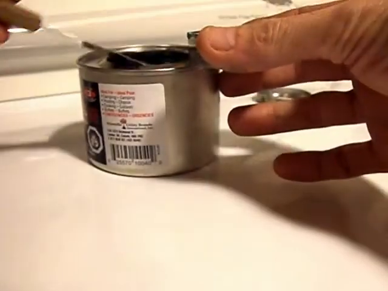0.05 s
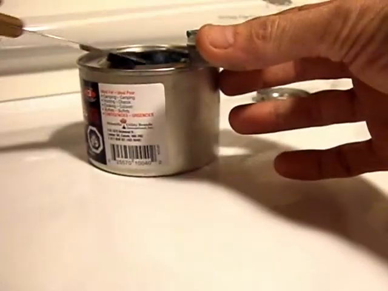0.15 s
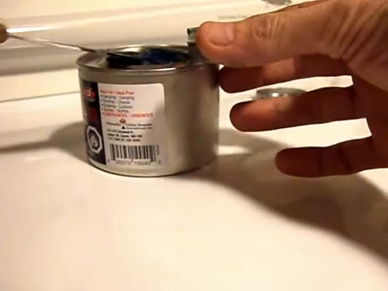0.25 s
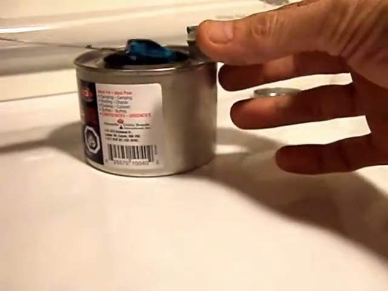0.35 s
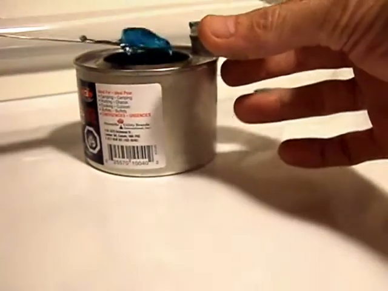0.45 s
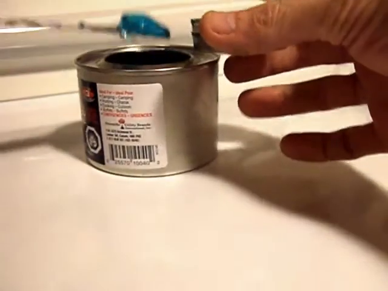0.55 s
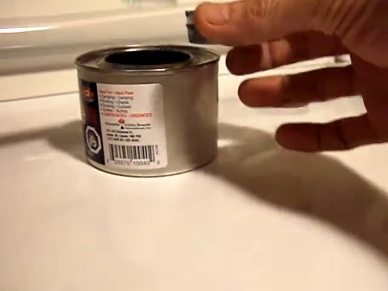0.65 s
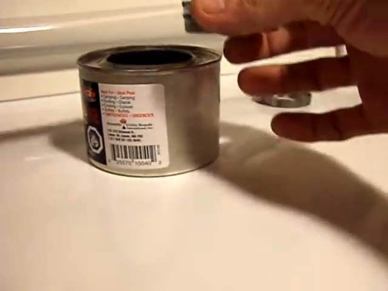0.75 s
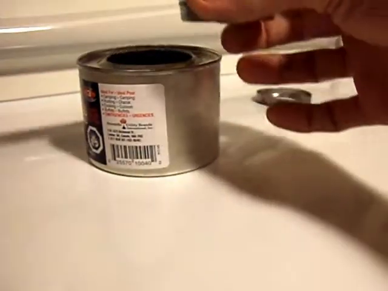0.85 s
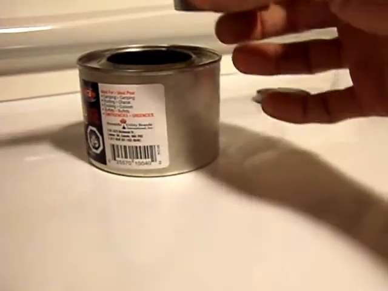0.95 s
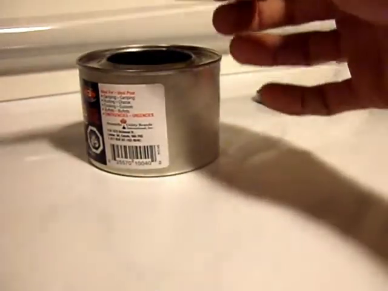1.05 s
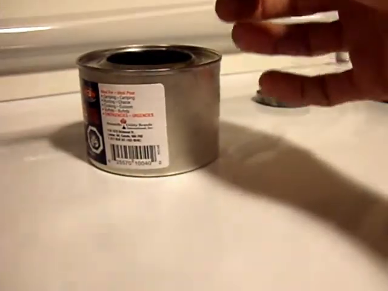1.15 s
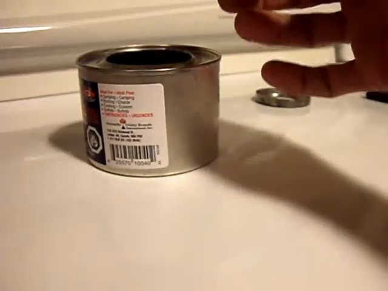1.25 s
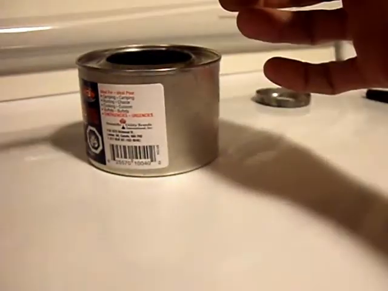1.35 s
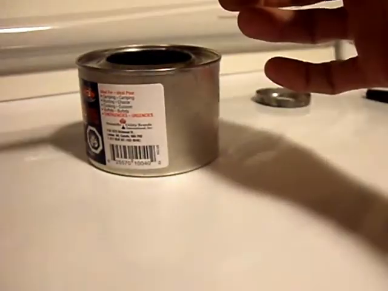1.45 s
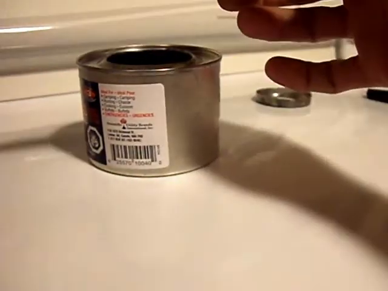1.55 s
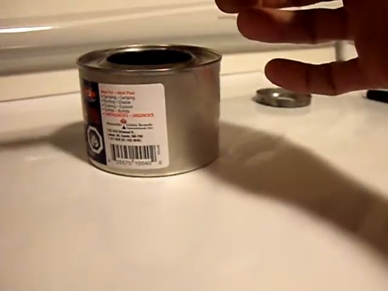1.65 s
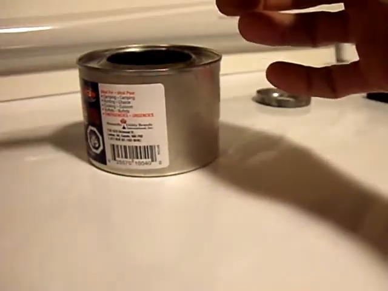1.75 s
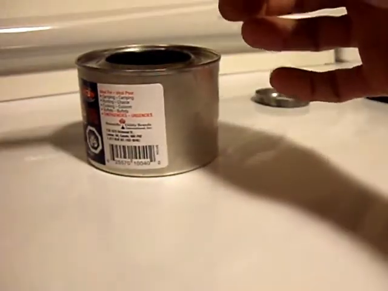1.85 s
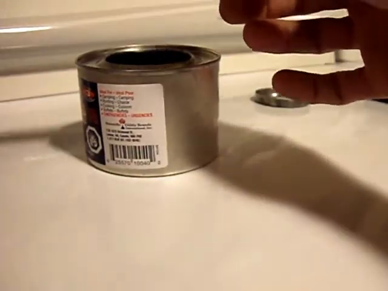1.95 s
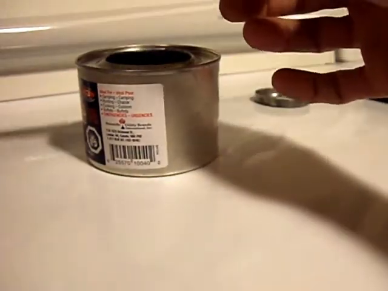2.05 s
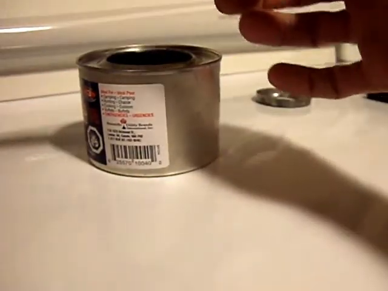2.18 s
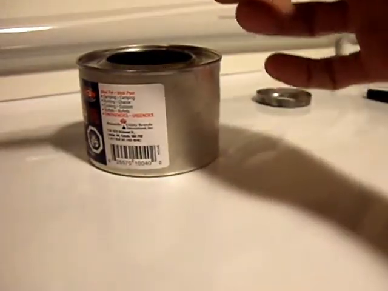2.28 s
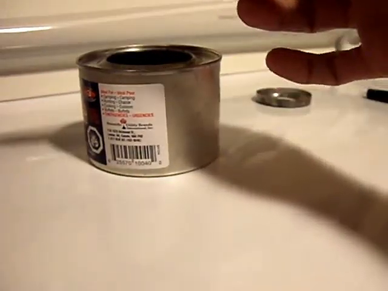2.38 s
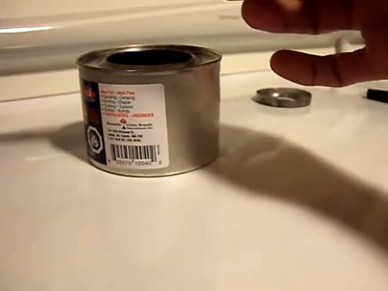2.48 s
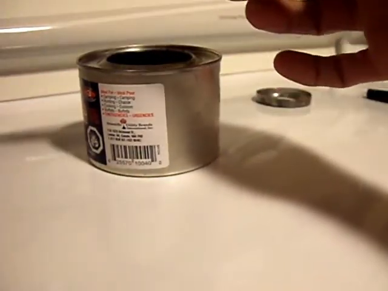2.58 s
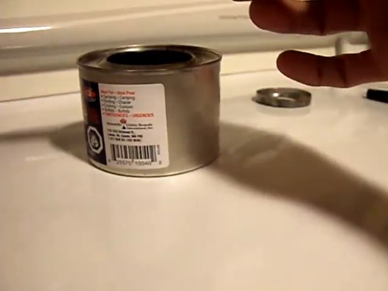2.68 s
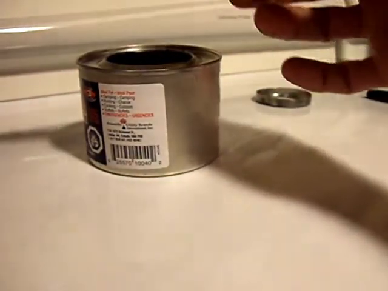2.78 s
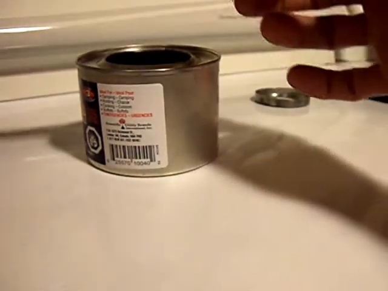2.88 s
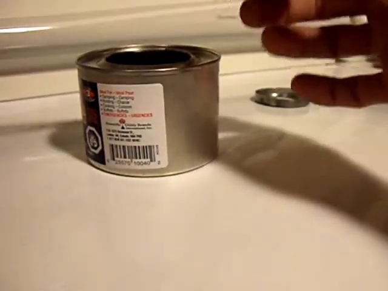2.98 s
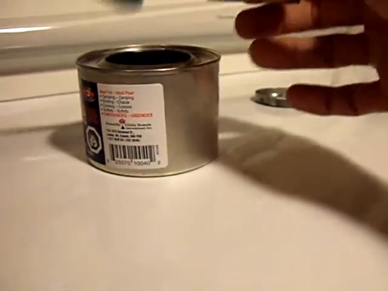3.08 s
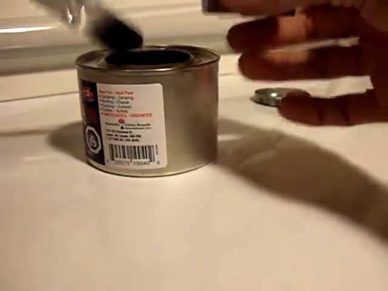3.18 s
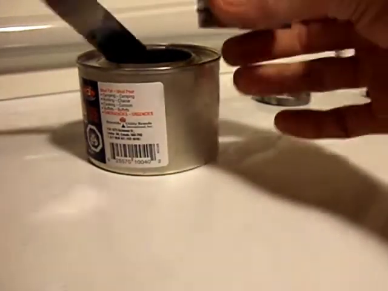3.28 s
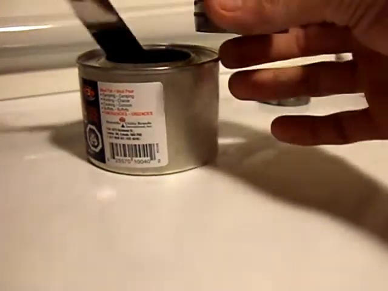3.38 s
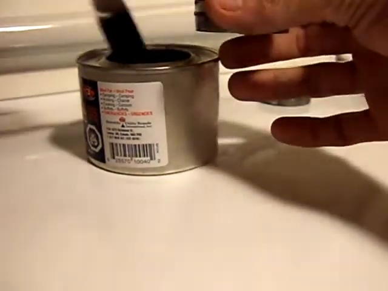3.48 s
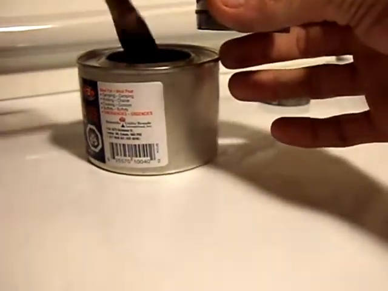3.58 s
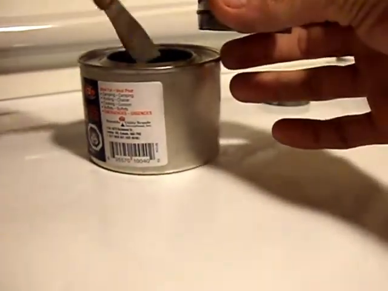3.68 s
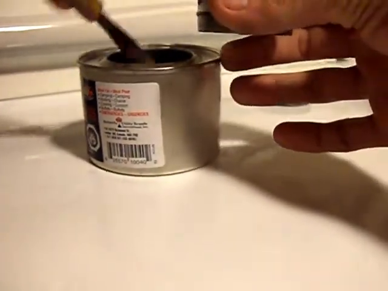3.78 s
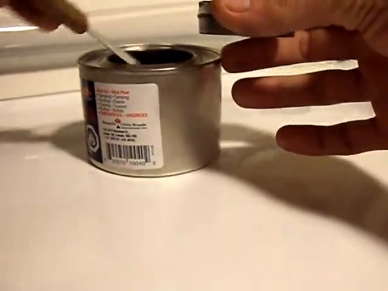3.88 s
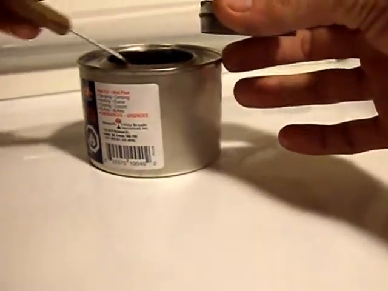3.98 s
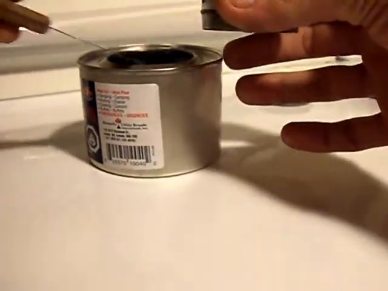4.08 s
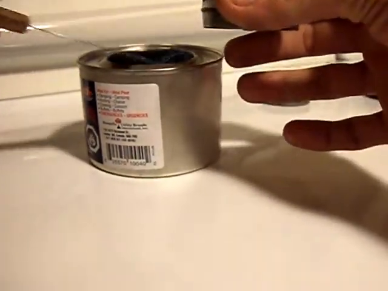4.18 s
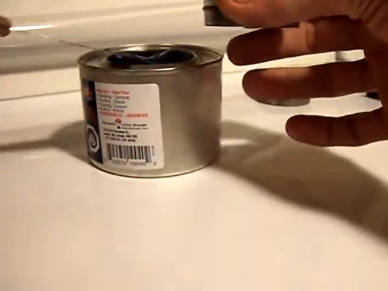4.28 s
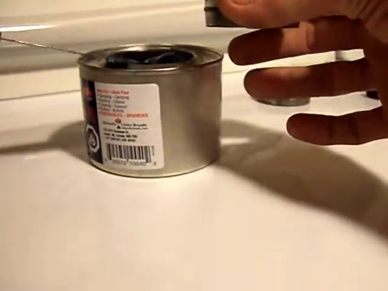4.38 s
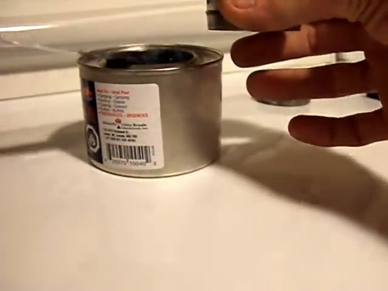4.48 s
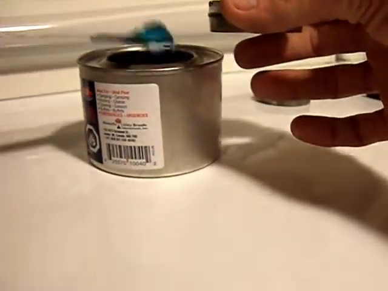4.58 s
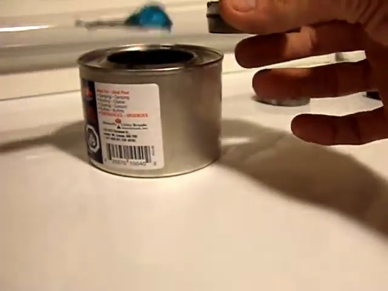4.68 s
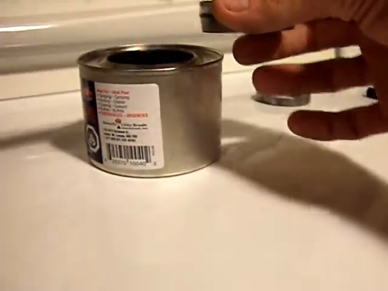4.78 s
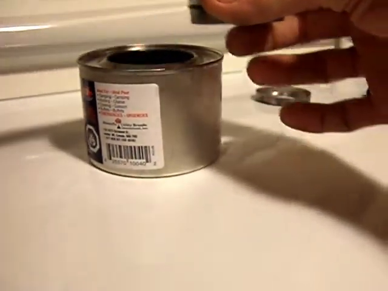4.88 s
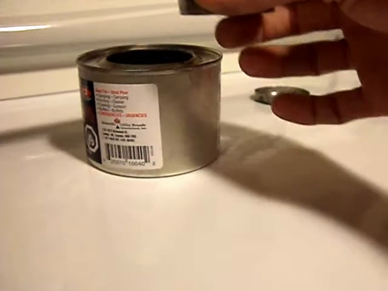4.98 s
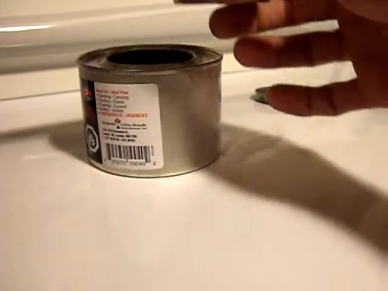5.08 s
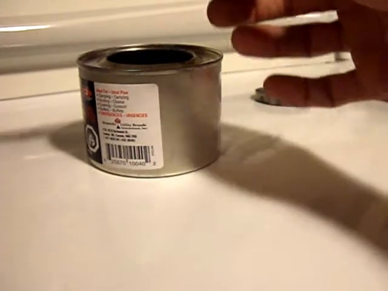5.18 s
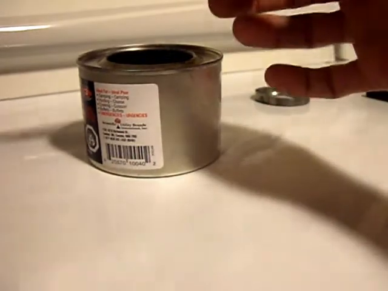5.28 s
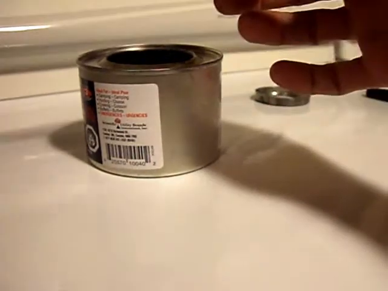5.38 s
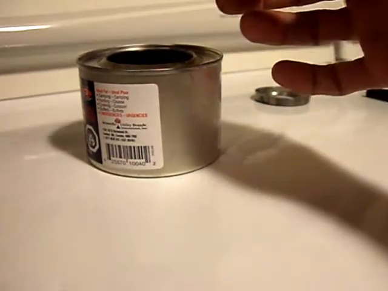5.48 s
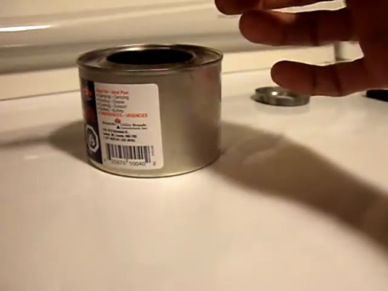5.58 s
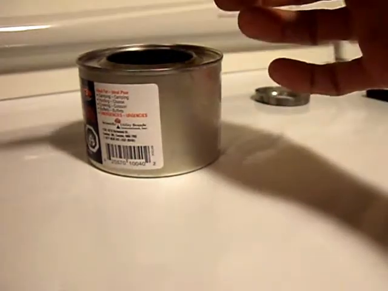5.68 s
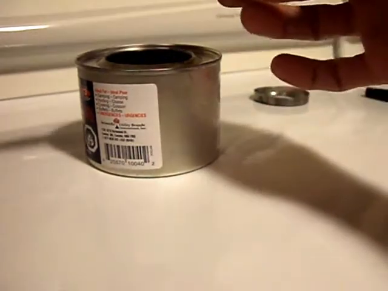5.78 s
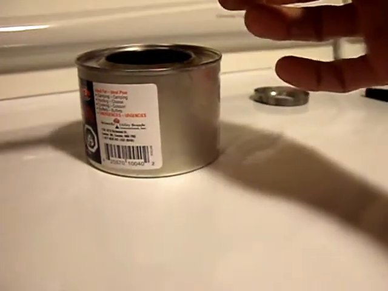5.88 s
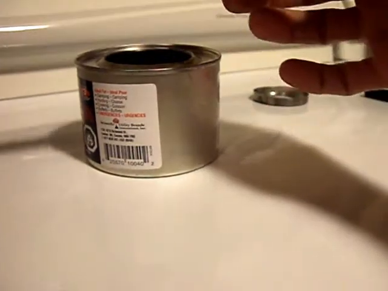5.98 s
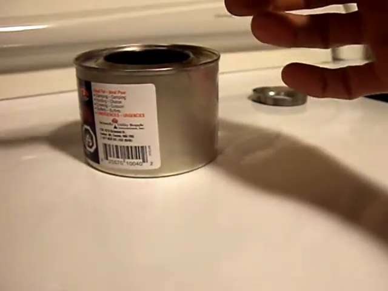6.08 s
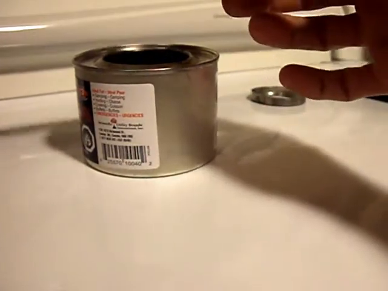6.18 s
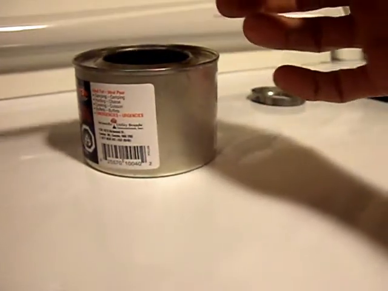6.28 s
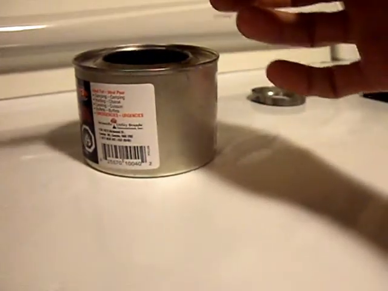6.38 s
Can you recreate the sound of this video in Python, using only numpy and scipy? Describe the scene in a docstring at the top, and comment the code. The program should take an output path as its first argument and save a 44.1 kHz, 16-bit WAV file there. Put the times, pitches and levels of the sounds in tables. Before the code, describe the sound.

Close up in a small, quiet room, a steel spoon moves thick gel from a can to a little tin. A soft opening scrape is followed by scattered high taps and fine squeaky scraping on the tin. Then come louder, lower clanks and gritty scrapes in the can on the counter, and finally light clicks on the tin again. A faint hum and thin electronic whine lie underneath.

```python
"""Spooning gel from a can into a tin

A steel spoon digs thick gel out of a can on a counter, knocking and scraping its rim, and twice wipes
it off into a small hand-held tin, which clinks and rasps much higher. Impacts excite the free modes
of the metal; stick-slip friction drives its resonances for as long as a stroke lasts.
A quiet small room hums behind, and a camera close by adds its own thin whine."""
import sys
import numpy as np
from scipy import signal
from scipy.fft import rfft, irfft
from scipy.io import wavfile

SR = 44100
rng = np.random.default_rng(int(sys.argv[2]) if len(sys.argv) > 2 else 0)


def file_out(sig):
    """Save sig as 16-bit WAV at sys.argv[1]."""
    # one column per channel
    cols = np.atleast_2d(sig).T
    # limit, then scale
    lim = np.clip(cols, -1, 1)
    pcm = np.round(lim * 32767).astype(np.int16)
    wavfile.write(sys.argv[1], SR, pcm)


N = 284445
TIME = np.arange(N) / SR

# Resonances of the spoon pressed against the can. Each row: frequency in Hz, width in Hz, gain in dB.
SPOON_PEAKS = [(1125, 30, -3), (1680, 45, -7), (2250, 50, -9), (2318, 30, 1), (2380, 30, 2), (2645, 40, -9),
               (2800, 50, -9), (3130, 45, -12), (3455, 50, -9), (3690, 70, -12), (5610, 60, -15),
               (6265, 50, -11), (7480, 130, -17), (8100, 110, -18), (8700, 200, -16), (10600, 160, -17)]
# Spectra of contact noise on the can and on the tin. Each row: frequency in Hz, relative level in dB.
CAN_GRIT = [(60, -24.5), (1200, 17.5), (2500, 4.5), (3700, 9), (4800, 6.5), (6200, 6.5), (7100, -2.5),
            (8800, 4), (11500, 6.5), (14000, 2.5), (16000, -43)]
TIN_GRIT = [(60, 0), (300, -18.5), (1000, 0.5), (2000, 1), (2700, 1), (4500, -0.5), (5400, 4), (6500, 1.5),
            (7300, -23), (8200, 12), (9400, -3), (11500, 9), (14000, -4), (16000, -11)]


def can_knocks():
    """Impact excitation: the wall flexes with a crack, can and spoon ring on, the counter thumps."""
    # Blows on the can. Each row: time in seconds, wall flex in dB, its pitch in Hz, then can ring,
    # spoon ring, counter thump, hollow thud and crack, all in dB.
    knocks = [(0.132, -12, 790, -46.5, 6, -67, -58, -48), (3.3013, 8, 1225, -44, 32.5, -63, -27, -6.5),
              (3.631, -10, 1120, -49, -2, -38, -32, -24), (3.679, 2, 1123, -32, 18, -24.5, -20, -11),
              (3.902, 7.5, 971, -20, 24.5, -48, -19.5, -7.5), (4.42, 12.5, 949, -16, 19.5, -66, -59, -7.5)]
    # Free modes of the can. Each row: frequency in Hz, level in dB, 60 dB decay time in seconds.
    can_modes = [(546, -22, .8), (824, 0, .19), (904, -6, .2), (958, -5, .48), (1023, -22, .29),
                 (1217, -28, .57), (1389, -25, .33), (1787, -25, .26), (3354, -33, .22), (3618, -32, .25),
                 (5426, -35, .29), (9539, -32, .15)]
    # Spectrum of the hollow thud. Each row: frequency in Hz, relative level in dB.
    hollow = [(40, -10), (100, -22), (160, -8.5), (280, 1), (400, 4), (500, 5), (640, 5.5), (800, 12),
              (1500, -10), (4000, -66)]
    body, cracks, spoon, thuds = np.zeros((4, N))
    can_ring = sum((-1) ** k * from_db(db) * mode(hz, t60, rise=.002)
                   for k, (hz, db, t60) in enumerate(can_modes))
    thump = (mode(hz=207.6, t60=.1, rise=.003) - .46 * mode(hz=160, t60=.052, rise=.006)
             + .5 * mode(hz=233, t60=.18, rise=.0014))
    for s, flex_db, wall_hz, can_db, spoon_db, thump_db, thud_db, crack_db in knocks:
        add(body, s, from_db(flex_db) * mode(wall_hz, t60=.02, rise=.0066))
        add(body, s, from_db(can_db) * can_ring)
        add(body, s, from_db(thump_db) * thump)
        add(thuds, s, from_db(thud_db) * burst(t60=.25, rise=.001))
        add(cracks, s, from_db(crack_db) * (burst(t60=.026) + .032 * burst(t60=.06)))
        add(spoon, s, from_db([spoon_db]))  # a single impulse
    return body + colour(thuds, hollow) + colour(cracks, CAN_GRIT) + resonate(spoon, SPOON_PEAKS)


def can_scrapes():
    """Forced vibration: the same slips shake and flex the wall, ring the spoon, rasp and spit grit."""
    # Drags over the rim. Each row: start and length in seconds; swell, wall, flex, rasp, spoon ring
    # and grit in dB; flex pitch in Hz.
    strokes = [(0.0, .15, -6.5, -45.5, -34, -43, -45.5, -49, 776),
               (3.31, 0.17, -2, -22, -17.5, -25, -20.5, -30, 1100),
               (3.634, 0.018, -4, -51, -40, -42, -28.5, -26.5, 1080),
               (3.68, 0.06, -12, -30.5, -32, -26, -55, -27, 1010),
               (3.915, 0.055, 2.5, -32, -32, -36.5, -35, -29, 940),
               (3.97, 0.066, 10.5, -25.5, -26.5, -24, -35, -21, 1010)]
    # Wall modes damped by the spoon; two narrow ones linger.
    # Each row: frequency in Hz, width in Hz, gain in dB.
    wall_peaks = [(548, 4, -9), (569, 20, -11), (750, 35, -9), (820, 22, -3), (907, 16, 0), (957, 5, 4),
                  (1125, 26, -2), (1178, 55, 2), (1308, 24, 2), (1383, 24, 1), (1490, 30, -9),
                  (1720, 120, -9)]
    # Spectrum of the rasp. Each row: frequency in Hz, relative level in dB.
    rasp_spectrum = [(40, -92), (100, -48), (200, -10.5), (450, -6.5), (800, 6.5), (1250, 2.5),
                     (1550, -3.5), (2400, 0.5), (3800, -4.5), (6000, -18.5)]
    friction = slips(per_s=1500, spread_db=-2.5, smooth=.62, jerk_db=1.5, jerks_per_s=193)
    shake, flex, rasp, spoon, grit = (
        friction * stroke_gain(strokes, column, attack_s=.0014, release_s=.018) for column in range(3, 8))
    wall = from_db(19.5) * resonate(shake, wall_peaks) + from_db(-2) * colour(rasp, rasp_spectrum)
    flex_hz = stroke_pitch(strokes)
    overtone = from_db(2.5) * glide(flex, 2.19 * flex_hz, width_hz=80)
    contact = from_db(-13.5) * (glide(flex, flex_hz, width_hz=80) + overtone)  # wall under the spoon
    spoon_ring = from_db(14.5) * resonate(spoon, SPOON_PEAKS)
    return wall + contact + spoon_ring + from_db(-5) * colour(shimmer(grit), CAN_GRIT)


def tin_taps():
    """Damping: gel and fingers choke the tin's base quickly; its rim clatters and rings longer."""
    # Taps on the tin. Each row: time in seconds, then base, rim ring, crack and dull thud in dB.
    taps = [(1.268, -5, -20.5, -31.5, -45), (1.3368, -8, -30, -25, -40.5), (1.3958, -24, -29.5, -38, -44),
            (1.6274, -7, -45, -31, -62), (1.8449, -18, -46.5, -41, -64), (2.3416, 3.5, -46, -23, -57),
            (2.366, -7, -46, -39, -49), (2.476, -23, -41, -43, -47), (2.758, -33, -58, -40, -66),
            (2.8579, -16, -50, -34, -42), (2.935, -5.5, -60, -29, -41), (2.9554, -8, -66, -34, -30),
            (5.797, -14, -43, -30.5, -62), (5.8371, -16.5, -66, -29, -66), (5.885, -24, -66, -48, -62),
            (5.98, -21, -52, -40.5, -60), (6.058, -19, -66, -37.5, -66), (6.113, -17, -63, -36, -66),
            (6.146, -19, -70, -44, -64)]
    # Free modes of the rim. Each row: frequency in Hz, level in dB, 60 dB decay time in seconds.
    rim_modes = [(2564, -21, .06), (2623, -1, 0.14), (3530, -8, 0.075), (3880, -11, 0.14),
                 (3980, -8, 0.078), (5609, -19, 0.15), (6250, -8, 0.09), (8247, -25, 0.16)]
    # Spectra of the rim's clatter and the dull thud. Each row: frequency in Hz, relative level in dB.
    clatter_spectrum = [(500, -74), (1200, -7), (2100, -12), (2700, 7.5), (3200, -3), (4100, -4),
                        (4800, -0.5), (5500, -5), (6400, -1), (7300, -19), (8300, -3.5), (9500, -21),
                        (15000, -12)]
    thud_spectrum = [(80, -42), (250, 12), (900, 8.5), (1400, 0), (2200, 9), (5000, -19)]
    body, cracks, clatter, thuds = np.zeros((4, N))
    rim_ring = sum(from_db(db) * mode(hz, t60) for hz, db, t60 in rim_modes)
    for s, base_db, rim_db, crack_db, thud_db in taps:
        add(body, s, from_db(base_db) * mode(base_pitch(s), t60=.015, rise=.0031))
        add(body, s, from_db(rim_db) * rim_ring)
        add(clatter, s, from_db(rim_db) * (2.1 * burst(t60=.021) + .84 * burst(t60=.056)))
        add(cracks, s, from_db(crack_db) * (.5 * burst(t60=.074) + 2 * burst(t60=.015)))
        add(thuds, s, from_db(thud_db) * burst(t60=.072))
    return body + colour(cracks, TIN_GRIT) + colour(clatter, clatter_spectrum) + colour(thuds, thud_spectrum)


def tin_scrapes():
    """Frictional excitation: fine, wet slips ring the base and squeak, with a broad overtone above."""
    # Wipes round the tin. Each row: start and length in seconds; swell, base ring, squeak and grit
    # in dB; squeak pitch in Hz.
    strokes = [(1.385, 0.031, 5, -32, -26.5, -50, 2710), (1.744, 0.19, 2, -50, -55, -55, 6240),
               (1.926, 0.064, -4, -37.5, -37.5, -41, 6250), (2.368, 0.11, -24, -48, -33.5, -46, 3380),
               (2.472, 0.035, -1, -41, -39, -46.5, 4600), (2.54, 0.018, 10, -40.5, -34, -58, 4770),
               (2.584, 0.028, 4, -37.5, -28.5, -41.5, 4860), (2.678, 0.2, 7, -45.5, -37.5, -47, 5000),
               (2.841, 0.081, 11, -38.5, -39.5, -42.5, 6100), (2.934, 0.018, 17, -30, -26, -34, 5270),
               (5.99, 0.15, 1, -47.5, -65, -51, 5230), (6.1, 0.045, 7, -41, -61, -39, 5400)]
    friction = slips(per_s=1300, spread_db=7, smooth=.4, jerk_db=4, jerks_per_s=140)
    base, contact, grit = (
        friction * stroke_gain(strokes, column, attack_s=.0088, release_s=.008) for column in (3, 4, 5))
    base_hz = base_pitch(TIME) + 130 * jerks(per_s=63)  # uneven pressure bends the base
    squeak_hz = stroke_pitch(strokes)
    ring = from_db(-2.5) * glide(base, base_hz, width_hz=150)
    squeak = from_db(-9.5) * glide(contact, squeak_hz, width_hz=520)
    overtone = from_db(-6) * glide(grit, 2 * squeak_hz, width_hz=3300)
    return ring + squeak + overtone + from_db(-1.5) * colour(shimmer(grit), TIN_GRIT)


def base_pitch(s):
    """Mass loading: the tin's base sinks in pitch as gel gathers on it."""
    # Resonance of the base. Each row: time in seconds, frequency in Hz.
    pitches = [(1.3, 4040), (2.34, 3966), (2.95, 3880), (6.1, 3764)]
    return np.interp(s, *np.transpose(pitches))


def slips(per_s, spread_db, smooth, jerk_db, jerks_per_s):
    """Stick-slip friction: uneven tiny releases over smooth rubbing, coming in jerks."""
    sizes = from_db(spread_db * rng.uniform(-1, 1, N)) * rng.choice([-1, 1], N)
    releases = rms_one(sizes * (rng.random(N) < per_s / SR))
    rubbing = smooth * rng.standard_normal(N)
    return rms_one((releases + rubbing) * from_db(jerk_db * jerks(jerks_per_s)))


def stroke_gain(strokes, column, attack_s, release_s):
    """Contact envelope: each stroke bites, swells or eases evenly in dB, and dies as the spoon lifts."""
    gain = np.zeros(N)
    t = TIME[:SR // 2]
    for stroke in strokes:
        start, length, swell_db = stroke[:3]
        pressure = from_db(stroke[column] + swell_db * (np.minimum(t / length, 1) - .5))
        bite = 1 - np.exp(-t / attack_s)
        lift = np.exp(-np.maximum(t - length, 0) / release_s)
        add(gain, start, pressure * bite * lift)
    return gain


def stroke_pitch(strokes):
    """Contact resonance: each stroke touches its own spot, whose pitch holds until the next stroke."""
    start, *_, hz = np.transpose(strokes)
    return hz[np.maximum(np.searchsorted(start, TIME) - 1, 0)]


def shimmer(x):
    """Modal coupling: a travelling contact favours now one, now another of the metal's high modes."""
    out = 0
    for k, hz in enumerate(np.geomspace(2600, 14800, 14)):
        coupling = (1 + .6 * jerks(per_s=40)) ** 2
        out = out + (-1) ** k * resonate(x * coupling, [(hz, .04 * hz, 2.4)])
    return out


def jerks(per_s):
    """Random modulation: a zigzag between -1 and 1."""
    turns = rng.uniform(-1, 1, 4096)
    return np.interp(TIME * per_s, np.arange(len(turns)), turns)


def resonate(x, peaks):
    """Modal superposition: parallel two-pole resonances of alternating sign."""
    out = 0
    for k, (hz, width, db) in enumerate(peaks):
        r = np.exp(-np.pi * width / SR)
        zeros = [(1 - r * r) / 2, 0, (r * r - 1) / 2]
        poles = [1, -2 * r * np.cos(2 * np.pi * hz / SR), r * r]
        out = out + (-1) ** k * from_db(db) * signal.lfilter(zeros, poles, x + 1e-18)
    return out


def glide(x, hz, width_hz):
    """Moving resonance: a one-pole filter in a frame that turns with the pitch."""
    turn = np.exp(2j * np.pi * np.cumsum(hz) / SR)
    r = np.exp(-np.pi * width_hz / SR)
    return (turn * signal.lfilter([np.sqrt(2 - 2 * r * r)], [1, -r], x / turn + 1e-18)).real


def colour(x, spectrum):
    """Minimum-phase filtering to the given spectrum; white noise keeps its power."""
    hz, db = np.transpose(spectrum)
    grid = np.fft.rfftfreq(8192, 1 / SR)
    shape = rms_one(from_db(np.interp(np.log(grid + 1), np.log(hz), db)))
    cepstrum = irfft(np.log(shape))
    cepstrum[1:len(grid) - 1] *= 2  # folding onto positive time makes the filter causal
    cepstrum[len(grid):] = 0
    return signal.oaconvolve(x, irfft(np.exp(rfft(cepstrum))))[:N]


def mode(hz, t60, rise=.000095):
    """Damped oscillation: one decaying sine."""
    return fade(t60, rise) * np.sin(2 * np.pi * hz * TIME[:SR // 2])


def burst(t60, rise=.00049):
    """Modal overlap: countless short-lived modes merge into a decaying puff of noise."""
    return fade(t60, rise) * rng.standard_normal(SR // 2)


def fade(t60, rise):
    """Exponential decay of 60 dB in t60 seconds after a quick rise, half a second in all."""
    t = TIME[:SR // 2]
    return (1 - np.exp(-t / rise)) * np.exp(-np.log(1000) * t / t60)


def add(track, s, sound):
    """Superposition: mix a sound in from time s."""
    start = max(int(s * SR), 0)
    track[start:start + len(sound)] += sound[:N - start]


def from_db(db):
    """Decibels to amplitude gain."""
    return 10 ** (np.asarray(db) / 20)


def rms_one(x):
    """Normalisation to unit power."""
    return x / np.sqrt(np.mean(x ** 2) + 1e-20)


def room(x):
    """Reverberation: early reflections off the counter and the wall, then a short, duller tail."""
    early, late = np.zeros((2, N))
    add(early, .005, burst(t60=.15, rise=.00085))
    add(late, .012, burst(t60=.36, rise=.012))
    late = colour(late, [(100, 18.5), (1000, -2.5), (4000, -7), (15000, -17.5)])
    response = (from_db(-12) * rms_one(early) + from_db(-15.5) * rms_one(late)) / np.sqrt(N)
    return x + signal.fftconvolve(x, response[:SR])[:N]


def background():
    """Noise floor: room air, hum, and a whine whose phase restarts with each picture the camera takes."""
    # Spectrum of the room air. Each row: frequency in Hz, relative level in dB.
    air_spectrum = [(25, -24), (55, -14), (80, -19), (110, -3), (200, -1), (420, 0), (700, -5),
                    (2000, -10.5), (4000, -16.5), (7300, -23.5), (9000, -22), (11000, -22), (12500, -18.5),
                    (15500, -24)]
    # Slow drift of the whole background. Each row: time in seconds, relative level in dB.
    drift = [(.25, -51), (1.2, -45), (3, -44), (5.6, -45.5), (6.3, -43.5)]
    # Hum and electronic tones. Each row: frequency in Hz, average rms level in dB.
    tones = [(59, -71), (117, -64.5), (173, -67), (8183, -71)]
    whine_hz, picture_hz, first_picture_s = 14462, 29.97, .0051
    air = rms_one(colour(rng.standard_normal(N), air_spectrum))
    hum = sum(from_db(db) * np.sqrt(2) * np.sin(2 * np.pi * (hz * TIME + rng.random()))
              for hz, db in tones)
    since_picture = (TIME - first_picture_s) % (1 / picture_hz)
    whine = from_db(-55.7) * np.sin(2 * np.pi * whine_hz * since_picture)
    level = from_db(np.interp(TIME, *np.transpose(drift)))
    return level * air * from_db(-4.5) + rms_one(level) * (hum + whine)


def scene():
    """Superposition: spoon, can and tin sound in the room, over its background."""
    metal = can_knocks() + can_scrapes() + tin_taps() + tin_scrapes()
    return (room(metal) + background())[None]


def record(dry):
    """Saturation and band limiting: the loudest knocks overload; deep bass and the top are cut."""
    ceiling, low_hz, high_hz = 1.3, 60, 15900
    saturated = ceiling * np.tanh(dry / ceiling)
    thinned = signal.sosfilt(signal.butter(2, low_hz, "high", fs=SR, output="sos"), saturated)
    return signal.sosfilt(signal.ellip(10, .1, 80, high_hz, fs=SR, output="sos"), thinned)


dry = scene()
out = record(dry)
file_out(out)
```